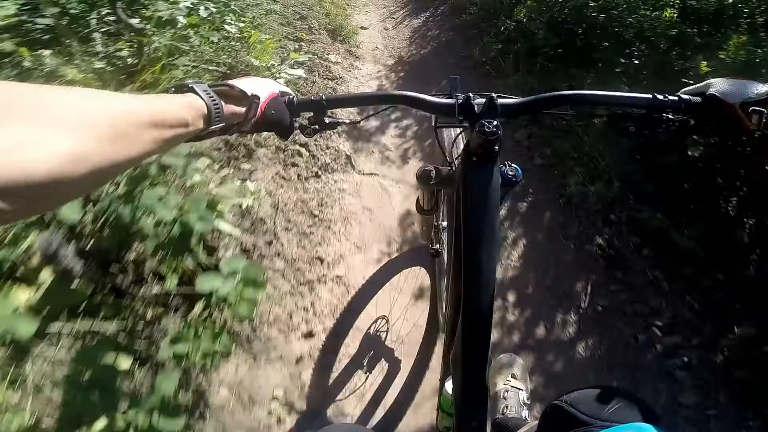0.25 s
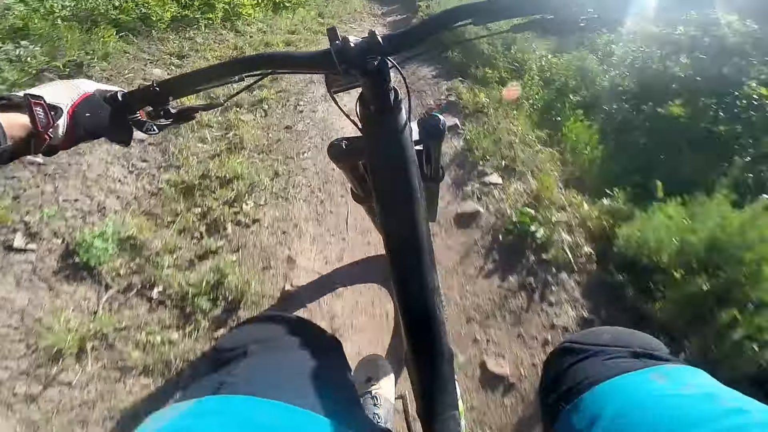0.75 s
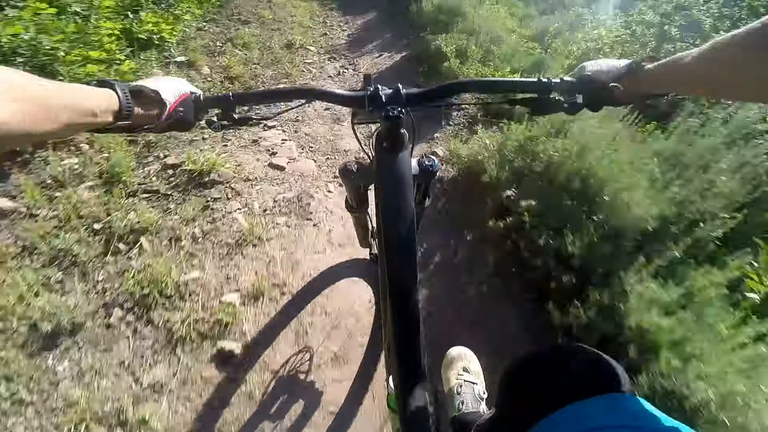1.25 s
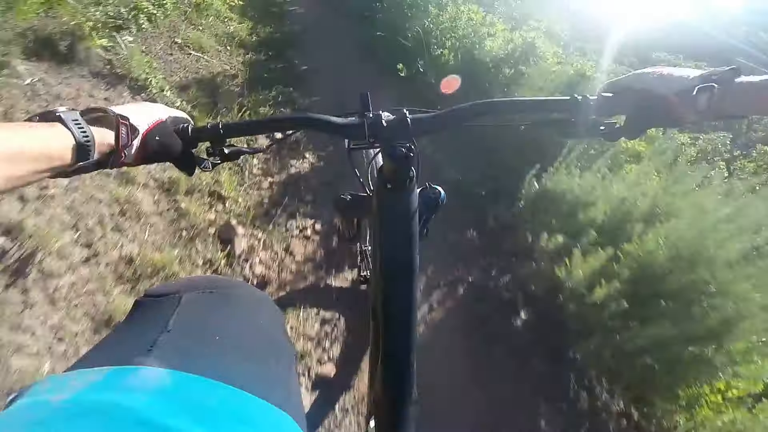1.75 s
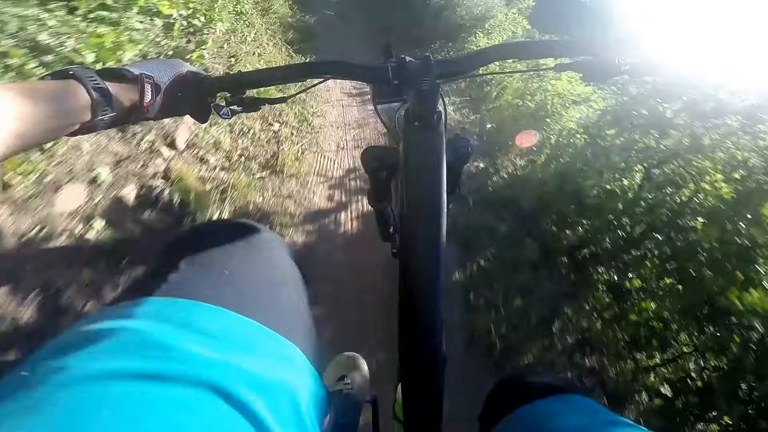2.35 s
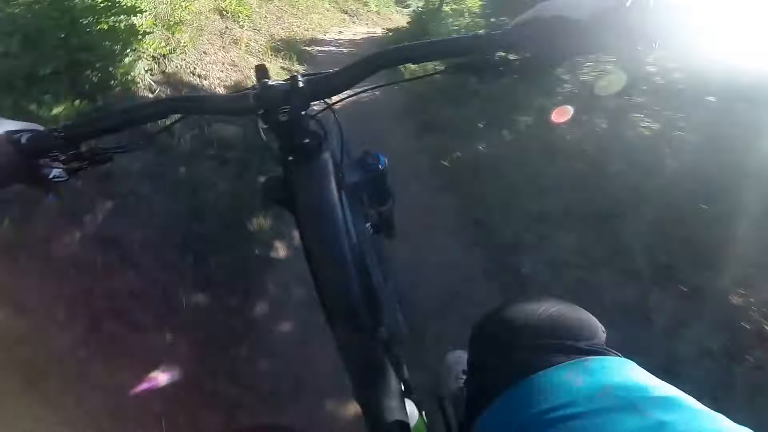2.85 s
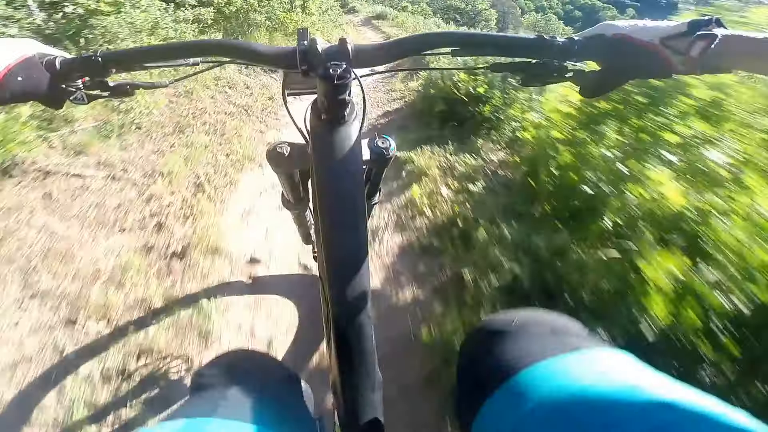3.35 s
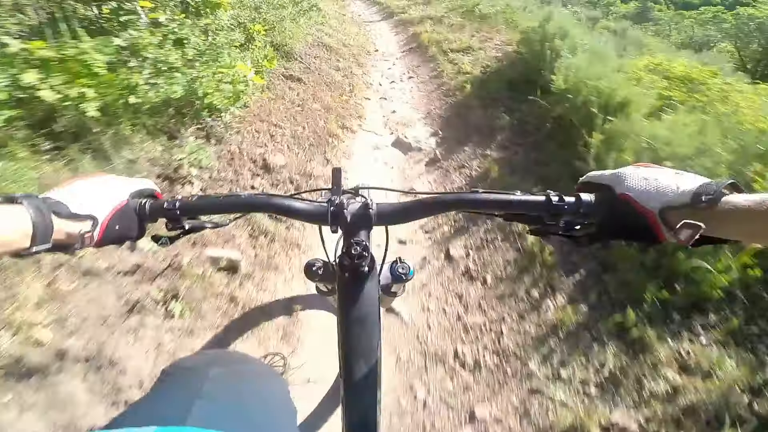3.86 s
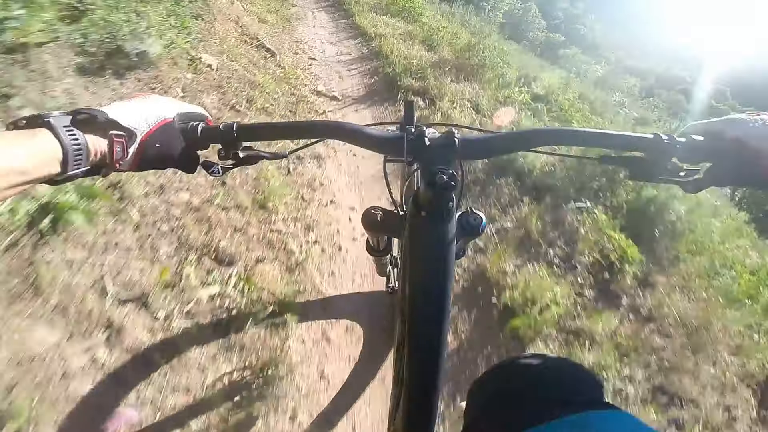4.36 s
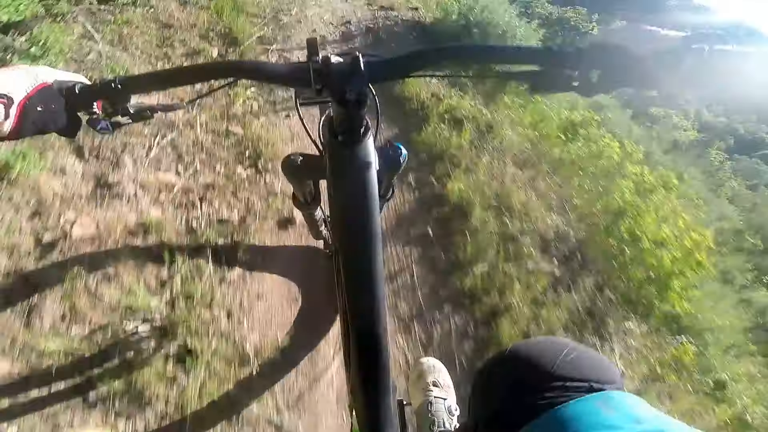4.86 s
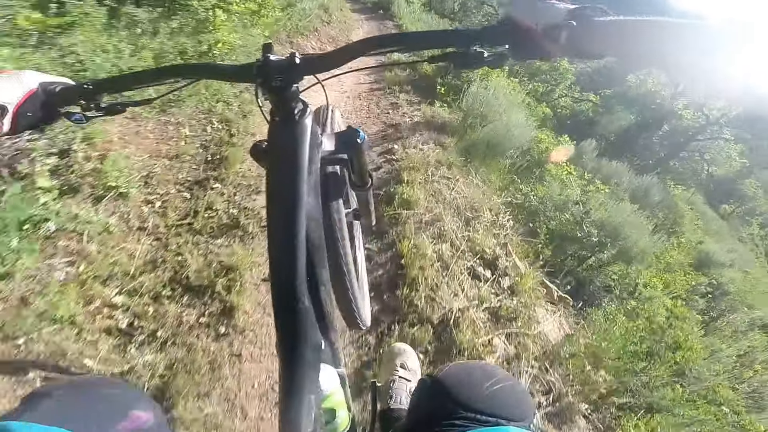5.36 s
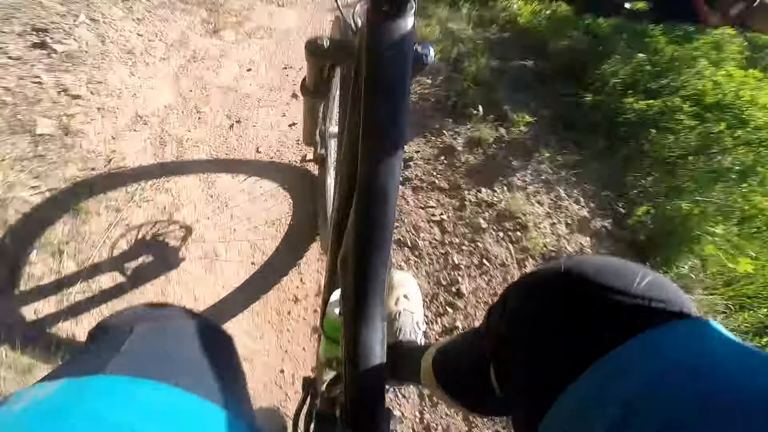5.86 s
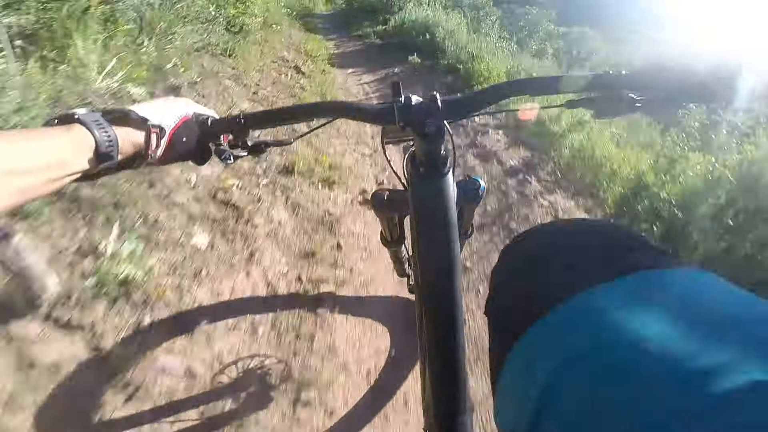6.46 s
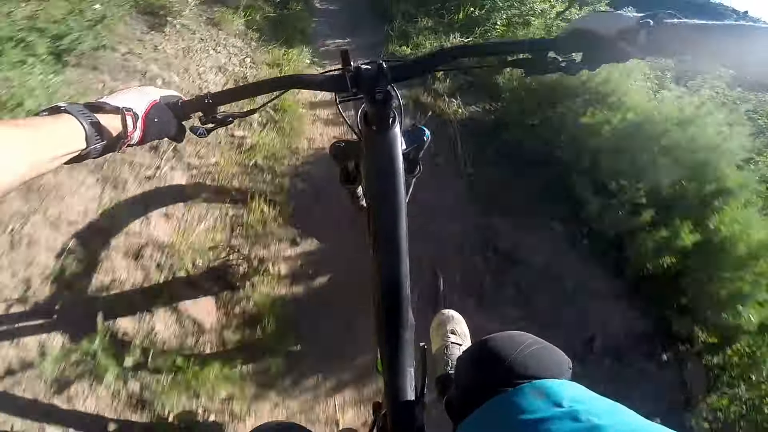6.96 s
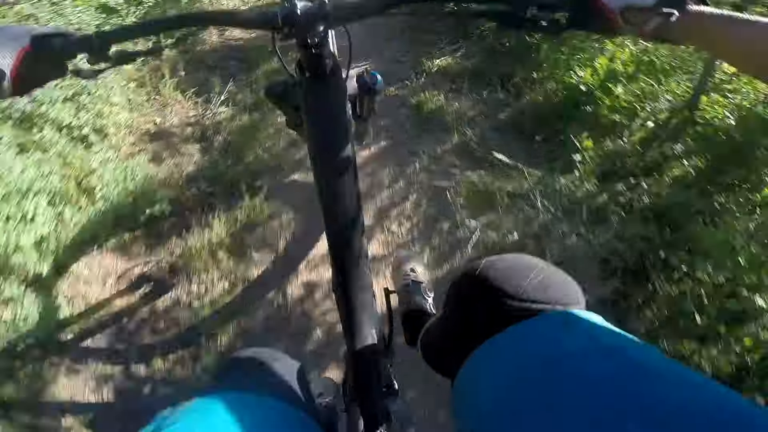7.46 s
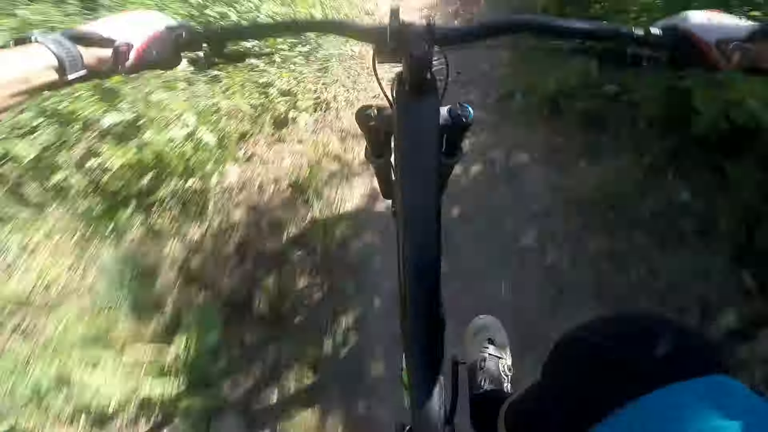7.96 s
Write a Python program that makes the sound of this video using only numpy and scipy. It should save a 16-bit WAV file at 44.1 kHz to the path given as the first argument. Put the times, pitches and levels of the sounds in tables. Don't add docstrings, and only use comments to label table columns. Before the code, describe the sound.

Close plastic knocks and deep thuds jolt over muffled wind, faint tyre grit and chain hiss as a bike rolls fast on rough dirt.

```python
import sys
import numpy as np
from scipy import signal
from scipy.io import wavfile

SR = 44100
rng = np.random.default_rng(int(sys.argv[2]) if len(sys.argv) > 2 else 0)


def wav_record(signal):
    frames = np.transpose(np.atleast_2d(signal))
    bounded = np.clip(frames, -1, 1)
    quanta = np.round(bounded * 32767).astype(np.int16)
    wavfile.write(sys.argv[1], SR, quanta)


def volts_from_decibels(level):
    exponent = np.asarray(level, float) / 20
    return 10 ** exponent


N = 362061

# time in seconds, buffeting level in dB.
GUSTS = [(0.0, -21), (0.17, -33), (0.4, -19.5), (0.67, -27.5), (0.84, -34.5), (1.2, -25), (2.6, -24),
         (3.02, -27.5), (3.25, -30.5), (3.52, -24.5), (3.72, -30), (4.02, -22.5), (5.19, -21),
         (5.65, -35.5), (6.0, -16.5), (6.25, -26.5), (7.95, -27.5), (8.21, -33.5)]
# time in seconds, extra rumble in dB.
GROUND = [(0.0, 0.5), (0.5, 5), (0.85, -1.5), (2.55, 5), (3.3, 0.5), (5.05, 3), (5.4, 1), (6.3, 3.5),
          (6.8, -7), (7.3, 6.5), (7.75, -1.5), (8.21, -3.5)]
# frequency in Hz, width in Hz, level in dB.
RUMBLE_PEAKS = [(104, 63, -6), (194.6, 101, -7), (274, 62.5, -7)]
# time in seconds, tyre grit level in dB, drivetrain hiss level in dB.
ROLL = [(0.0, -55.5, -65), (0.41, -51.5, -66), (1.17, -51.5, -68.5), (1.48, -49.5, -66.5),
        (2.12, -49.5, -64.5), (2.47, -53.5, -66.5), (2.9, -52, -68.5), (3.06, -52.5, -65),
        (3.47, -51.5, -66.5), (4.39, -51, -68), (4.62, -53.5, -63.5), (5.28, -47, -63.5),
        (5.67, -55.5, -64), (5.99, -43, -60.5), (6.27, -52, -69.5), (6.85, -53.5, -64), (7.87, -52.5, -65),
        (8.21, -58.5, -76)]
# frequency in Hz, width in Hz, level in dB.
GRIT_PEAKS = [(470, 133, 1), (1084, 540, -1.5), (1440, 220, 3), (2036, 560, 1.5), (2302, 570, 4),
              (3270, 74, -9.5)]
# frequency in Hz, width in Hz, level in dB.
HISS_PEAKS = [(3770, 1460, -3.5), (5200, 290, -2), (6230, 700, -1), (7400, 270, -13.5), (8600, 710, -22),
              (10300, 300, -26), (10280, 2700, -2.5)]
# start in seconds, length in seconds, level in dB.
PEDALLING = [
    (0.018, 0.78, -67.5),
    (1.72, 0.68, -61.5),
    (2.845, 0.31, -60),
    (4.35, 1.1, -66),
    (5.75, 0.8, -73),
    (6.75, 1.9, -68.5),
]
# frequency in Hz, width in Hz, level in dB.
CHAIN_PEAKS = [(5150, 380, 1), (7440, 260, -11), (3900, 140, 0), (3220, 82, -2), (6350, 1300, -12)]
# start in seconds, length in seconds, crisp level in dB, dull growl in dB.
SCRAPES = [(5.043, 0.06, -46, -35), (5.322, .045, -46, -60), (3.83, 0.14, -50, -56),
           (2.893, 0.12, -47, -54), (0.65, 0.076, -45.5, -49), (1.338, 0.16, -38, -36),
           (1.79, 0.02, -47, -39.5), (1.868, 0.1, -42, -60), (2.016, 0.02, -39.5, -57),
           (3.017, 0.11, -41, -46.5), (4.45, 0.23, -48.5, -71), (4.932, 0.093, -54, -34),
           (5.152, 0.11, -54, -37.5), (5.772, 0.14, -35, -65), (5.885, 0.036, -45, -33),
           (5.943, 0.073, -39, -23.5), (7.876, 0.058, -39.5, -39.5), (8.008, 0.068, -34.5, -31.5)]
# frequency in Hz, width in Hz, level in dB.
GROWL_PEAKS = [(239, 65, 8), (475, 240, -13.5)]
# start in seconds, level in dB, time to fall 60 dB in seconds.
SIZZLES = [
    (2.965, -45, .025),
    (3.014, -45, .025),
    (5.827, -33, .03),
    (5.836, -29, .015),
    (7.554, -38, .03),
    (1.453, -39, .025),
    (7.932, -40, .015),
    (1.384, -31, .015),
]
# centre in seconds, pressure (+ in, - out), half length in ms.
SHOVES = [(0.342, -0.13, 21), (0.679, 0.079, 10), (1.115, 0.12, 24), (1.384, -0.016, 26),
          (1.644, 0.099, 22), (1.806, 0.11, 13), (1.82, -0.074, 23), (1.838, -0.05, 7.6), (3.039, 0.13, 20),
          (3.506, 0.15, 11.5), (3.53, -0.075, 25), (3.979, -0.077, 12), (4.01, 0.093, 17),
          (4.105, -0.12, 13), (4.143, -0.15, 26), (4.531, -0.13, 28), (4.6, -0.18, 14), (4.639, 0.056, 14),
          (5.093, -0.16, 22), (5.963, -0.012, 11), (6.134, 0.11, 8.4), (6.418, -0.088, 21),
          (6.803, .09, 19), (1.356, -0.16, 37), (1.451, 0.31, 7.8), (1.468, -0.2, 11), (1.59, 0.42, 2.6),
          (1.602, -0.49, 11.4), (2.958, 0.13, 24), (2.977, -0.26, 15), (3.01, -0.14, 7.2), (3.922, 0.2, 11),
          (3.943, -0.18, 9.9), (4.123, 0.21, 7.7), (5.846, -0.3, 9.6), (5.865, 0.17, 6.1),
          (5.89, 0.091, 17), (5.98, 0.58, 4.3), (5.998, -0.51, 16), (6.021, 0.16, 39), (6.151, -0.33, 16),
          (6.269, -0.21, 16.5), (7.124, -0.18, 13), (7.402, -0.22, 11.5), (7.951, -0.31, 7.7),
          (7.971, 0.15, 15), (8.018, 0.17, 12), (8.055, 0.55, 3.3), (8.064, -0.39, 15)]
# start in seconds, level in dB, frequency in Hz, 60 dB decay in seconds.
WOBBLES = [(.656, -20.5, 71, 0.082), (1.077, -26.5, 117, 0.13), (1.32, -15.5, 72, 0.1),
           (2.55, -21, 98, .08), (2.69, -28, 90, 0.059), (2.952, -16, 95, 0.065), (3.989, -28, 126, 0.11),
           (4.62, -31.5, 210, 0.07), (5.576, -21.5, 60, 0.14), (6.45, -28.5, 110, 0.064),
           (6.899, -22.5, 79, 0.1), (1.116, -26, 260, 0.035), (1.375, -11.5, 124, 0.059),
           (1.44, -22, 264, 0.027), (1.51, -22.5, 128, 0.078), (1.59, 2.5, 174, 0.02),
           (4.526, -24, 273, 0.039), (4.938, -19, 95, 0.14), (4.95, -24, 304, 0.043),
           (4.967, -9.5, 124, 0.05), (4.98, -29, 290, 0.033), (5.054, -40, 330, 0.04),
           (5.184, -29, 267, 0.035), (7.38, -26, 267, 0.045), (7.425, -25, 277, 0.035),
           (5.935, -22, 260, 0.035), (4.99, -17.5, 121, 0.12), (5.041, -17.5, 240, 0.035),
           (5.11, -20, 121, 0.12), (5.169, -14, 160, 0.03), (5.914, -10, 140, 0.077),
           (5.956, -15, 170, 0.066), (5.987, -5, 122, 0.059), (6.124, -8.5, 180, 0.019),
           (7.147, -13, 123, 0.11), (7.173, -29, 133, 0.076), (7.316, -23.5, 99, 0.13),
           (7.587, -11.5, 120, 0.023), (7.985, -18, 119, 0.085), (8.028, -37, 270, 0.055),
           (8.053, 7.5, 169, 0.015)]
# start in seconds, level in dB,
# frequency in Hz, 60 dB decay in seconds.
KNOCKS = [(0.341, -21, 1376, 0.03), (0.341, -23, 457, 0.038), (1.384, -27, 606, 0.07),
          (5.0415, -21, 1077, 0.07), (5.041, -19, 476, 0.032), (5.0415, -25, 2230, 0.035),
          (1.4, -27, 450, 0.02), (5.914, -23, 920, 0.02), (5.912, -22, 400, 0.04), (1.819, -37, 480, 0.11),
          (6.485, -32, 480, 0.02), (6.595, -15, 360, 0.006), (3.05, -24, 1120, 0.026),
          (3.106, -37, 865, .04), (8.054, -18.5, 820, 0.013), (5.169, -13, 620, 0.009),
          (6.338, -27, 504, 0.044), (1.414, -17, 360, .025), (1.441, -17, 340, .018),
          (5.881, -21, 600, 0.05), (5.881, -19, 1540, 0.035), (5.958, -20, 400, 0.025),
          (5.996, -10, 520, 0.027), (5.996, -19, 1100, 0.03), (7.145, -21.5, 550, 0.008),
          (7.957, -27, 600, 0.09), (5.171, -25, 1250, .015),
          (5.012, -33, 1250, .04),
    (5.911, -25, 600, .03),
    (5.935, -30, 900, .02),
    (5.973, -25, 700, .02),
    (5.991, -24, 750, .02),
    (6.004, -25, 800, .02),
]
# time in
# seconds, level in dB, brightness in dB.
SHELL_BLOWS = [(1.3388, -19.5, -1), (1.3841, -3.5, 4), (1.3891, -12, -7), (1.4526, -17.5, 4),
               (1.4637, -3.5, -1.5), (1.4718, -27, -14), (1.4747, -11.5, 0), (1.501, -6.5, -2.5),
               (1.5132, -12.5, 4), (1.5191, -14, -8), (1.5779, -26, 6), (1.5802, -18, -13), (1.7086, -25, 6.5),
               (1.7119, -17.5, -0.5), (2.3462, -23.5, -18), (3.1059, -19, -12), (3.8382, -19.5, -23),
               (3.8905, -17, -9), (3.9125, -20.5, -19), (4.8192, -18.5, -10), (4.8645, -16.5, -8.5),
               (4.8706, -22, -17), (4.8771, -19, -4.5), (5.0414, -24, -19), (5.2515, -13.5, -1),
               (5.2546, -27, -6), (5.26, -17, -8), (5.2632, -16.5, 11.5), (5.2696, -10.5, 4), (5.3281, -4, -1),
               (5.342, -20, -5), (5.3976, -17.5, -21), (5.4085, -19.5, 1), (5.4412, -16, -8), (5.649, -15, -9),
               (5.8282, -10.5, -8.5), (5.8335, -20, 7), (5.8369, -2, -6.5), (5.8791, -5, -18), (5.8844, -9.5, -3),
               (5.89, -17.5, -19), (5.9591, -17, -21), (5.9971, -34, -14), (6.033, -24, -24), (6.0695, -18, 1),
               (6.1105, -18, 2.5), (6.3228, -14.5, -23), (7.4641, -18, -18), (7.5536, -14.5, -1),
               (7.5571, -21, 1), (7.5731, -19.5, -17), (7.7404, -8.5, 0.5), (7.7478, -21.5, -3),
               (7.9332, -6, -6.5), (7.9558, -5.5, -2), (7.9629, -4.5, -3), (7.9659, -9.5, -3), (7.9762, -18, -7),
               (7.9851, -13.5, -9), (7.9946, -15.5, -5),
               (1.4163, -35, -20), (2.968, -41, 14), (2.971, -48, 9), (3.0155, -41.5, 10),
               (3.0195, -46, 12), (5.5896, -23, -15), (5.8254, -17, -9), (7.855, -29, -18),
               (7.8899, -27, -16), (7.678, -36, -18), (7.5597, -30, 9)]
# time in seconds, level in dB.
PAD_TAPS = [(0.3394, -34), (0.3468, -28.5), (0.3771, -22.5), (0.4297, -35), (0.6755, -40), (0.9051, -34),
            (1.0792, -34), (1.3022, -21), (1.3983, -28), (1.6738, -28.5), (1.6788, -27.5), (1.7202, -20.5),
            (1.7722, -28), (1.8844, -29), (1.9034, -28), (1.9259, -22.5), (1.9318, -31), (2.2886, -31),
            (2.9081, -22), (3.0466, -33), (3.0498, -29), (3.0746, -22.5), (3.1168, -27), (3.2052, -24),
            (3.2138, -28), (3.3319, -24.5), (3.3346, -35), (3.3373, -23), (3.3409, -24), (3.8504, -25),
            (3.8756, -30), (3.9178, -30), (4.0183, -26.5), (4.3452, -31.5), (4.8108, -29), (4.9318, -26.5),
            (5.1699, -31), (5.4668, -25), (5.4727, -33), (5.6522, -37), (5.7817, -30.5), (5.898, -23),
            (5.9113, -28), (5.9921, -25), (6.1005, -24.5), (6.3061, -30), (6.3416, -37), (6.4839, -24.5),
            (7.5824, -32), (7.7221, -26), (7.7548, -24), (7.9097, -29), (8.0289, -31), (8.0546, -38),
            (8.2047, -36)]
# time in seconds, level in dB.
FACE_TAPS = [(0.3503, -41), (1.0573, -41), (1.0597, -39), (1.3107, -26), (1.3322, -20), (1.4412, -28),
             (1.4591, -20), (1.4837, -29), (1.5944, -24), (1.7242, -25.5), (1.7277, -26), (1.8944, -43),
             (1.9168, -45), (1.948, -32.5), (2.0185, -32.5), (2.8827, -34.5), (2.9399, -28),
             (2.9873, -35.5), (3.3268, -26), (3.5302, -34.5), (3.6667, -45), (3.8454, -32), (3.8964, -46),
             (3.9957, -33.5), (4.1529, -47), (4.1723, -55), (4.4886, -36), (4.8854, -35), (5.2046, -42),
             (5.2269, -25), (5.2312, -34), (5.2344, -21), (5.3247, -23), (5.3497, -29), (5.4161, -40),
             (5.5941, -21), (5.6023, -32), (5.6122, -27), (5.8178, -23), (5.8224, -28), (5.9727, -29),
             (6.008, -33), (6.1076, -30), (6.1484, -34), (6.2607, -21.5), (6.2756, -49), (6.2941, -36),
             (6.3011, -32), (7.4596, -21.5), (7.4695, -33), (7.5892, -46), (7.6479, -31), (7.653, -32),
             (7.9233, -35), (8.1279, -32.5)]
# time in seconds, level in dB.
EDGE_TICKS = [(0.2473, -34), (0.3909, -35), (1.0432, -43), (1.1247, -46), (1.1663, -46), (1.1897, -39),
              (1.2809, -33.5), (1.6419, -42), (1.8998, -42), (1.9117, -34), (2.9654, -35), (3.0151, -31),
              (3.1031, -33), (3.1144, -28), (3.1238, -28), (3.1322, -41), (3.1901, -31), (3.3556, -34.5),
              (3.5209, -45), (3.746, -45), (3.7897, -39), (3.9927, -42), (4.3082, -27.5), (4.4469, -32.5),
              (4.6446, -47), (4.8306, -49), (5.0118, -38), (5.1814, -41), (5.2097, -31.5), (5.2421, -31),
              (5.3159, -36), (5.3389, -27), (5.4245, -49), (5.4546, -45), (5.4771, -32.5), (5.5384, -41),
              (5.5735, -47), (5.5989, -32), (5.6061, -41), (5.8134, -36), (6.2105, -37.5), (6.2491, -28.5),
              (6.6733, -44), (7.3294, -44), (7.4155, -38.5), (7.5507, -30), (7.5633, -35), (7.609, -38),
              (7.6116, -34), (7.6176, -44), (7.6559, -30.5), (7.9502, -33), (8.0451, -29.5), (8.0576, -26),
              (8.1215, -38)]
# time in seconds, level in dB.
FLICKS = [(0.165, -48), (0.181, -49), (0.4174, -41), (1.2585, -49), (1.7823, -38), (1.8517, -32),
          (1.9904, -45), (2.1151, -44), (2.3017, -45), (2.3074, -38), (2.38, -48), (2.4239, -34),
          (2.5644, -56), (3.038, -39), (3.8082, -28), (3.9604, -35), (4.1006, -36), (4.5072, -34),
          (4.5301, -39), (4.5344, -29), (4.9781, -36), (5.1891, -29), (5.3654, -43), (5.5593, -43),
          (5.7892, -33), (5.8574, -46), (5.9409, -33), (5.9514, -33), (6.4557, -32), (7.0564, -40),
          (7.5378, -51)]
# frequency in Hz, level in dB, 60 dB decay in seconds.
SHELL_LOW = [(608, -5.5, 0.023), (1206, -7, 0.017), (1529, 1.5, 0.02), (1803, -4.5, 0.01),
             (2137, 5.5, 0.0074), (2540, 3, 0.01), (3210, -1, 0.0062)]
SHELL_HIGH = [(3170, 4, 0.0034), (5300, 2.5, 0.0028), (6580, -6, 0.005), (7580, -3, 0.0029)]
SHELL_TOP = [(8800, -24, 0.0018), (8920, -2, 0.00098), (11740, -10.5, 0.0032), (11400, -21, 0.0078),
             (13000, -37, .003)]


def in_time(rows):
    s, *columns = np.transpose(rows)
    return [np.interp(np.arange(N) / SR, s, column) for column in columns]


def rms_one(x):
    return x / np.sqrt(np.mean(x ** 2) + 1e-20)


def dulled(x, hz):
    return signal.sosfilt(signal.butter(3, hz, fs=SR, output="sos"), x)


def banded(x, order, low_hz, high_hz):
    return signal.sosfilt(signal.butter(order, [low_hz, high_hz], "band", fs=SR, output="sos"), x)


def drift(rate):
    r = np.exp(-80 * np.pi * rate / SR)
    noise = rng.standard_normal(N // 40 + 2002)
    slow = signal.lfilter([1], [1, -2 * r, r * r], noise)[2000:]
    return np.interp(np.arange(N) / 40, np.arange(len(slow)), rms_one(slow))


def grains(per_s, spread_db):
    sizes = volts_from_decibels(spread_db * np.minimum(rng.exponential(1, N), 5)) * rng.choice([-1, 1], N)
    return rms_one(sizes * (rng.random(N) < per_s / SR))


def resonant(force, peaks, patchy_db, rate):
    out = 0
    for k, (hz, width_hz, db) in enumerate(peaks):
        r = np.exp(-np.pi * width_hz / SR)
        band = signal.lfilter([1, 0, -1], [1, -2 * r * np.cos(2 * np.pi * hz / SR), r * r], force)
        flicker = volts_from_decibels(db + patchy_db * drift(rate))
        out = out + (-1) ** k * (1 - r * r) * flicker * band
    return rms_one(out)


def ring(force, hz, t60):
    r, w = volts_from_decibels(-60 / (t60 * SR)), 2 * np.pi * hz / SR
    return signal.lfilter([0, np.sin(w)], [1, -2 * r * np.cos(w), r * r], force + 1e-18)


def wind(level_db):
    eddies = banded(rng.standard_normal(N), 1, low_hz=14.1, high_hz=22.3)
    return volts_from_decibels(level_db - 6.5) * rms_one(dulled(eddies, hz=89.5))


def rumble(air_db, grit_db, lumps_db):
    wind_share, load_share = 0.089, 0.1
    level_db = -47 + in_time(GROUND)[0]
    level_db = level_db + wind_share * (air_db - air_db.mean()) + load_share * (grit_db - grit_db.mean())
    shaking = resonant(rng.standard_normal(N), RUMBLE_PEAKS, patchy_db=4.0, rate=5.3)
    return volts_from_decibels(level_db + 0.23 * lumps_db - 0.5) * dulled(shaking, hz=650)


def tyre_grit(level_db):
    stones = grains(per_s=1500, spread_db=0.5) + 0.84 * rng.standard_normal(N)
    heard = resonant(stones, GRIT_PEAKS, patchy_db=2.0, rate=9.0)
    return dulled(volts_from_decibels(level_db + 1.5) * heard, hz=4040)


def drivetrain(hiss_db, shake_db):
    links = grains(per_s=300, spread_db=2.5) + 1.5 * rng.standard_normal(N)
    low = 0.8 * volts_from_decibels(hiss_db + shake_db + 4.5) * resonant(links, HISS_PEAKS[:1], patchy_db=1.7, rate=5.0)
    middle = volts_from_decibels(hiss_db - 7.5) * resonant(links, HISS_PEAKS[1:2], patchy_db=4.0, rate=16.0)
    top = volts_from_decibels(0.5 * hiss_db - 45.5) * resonant(links, HISS_PEAKS[2:], patchy_db=1.5, rate=2.8)
    return low + middle + top + chain_song(links)


def chain_song(links):
    load = np.zeros(N)
    for s, length, db in PEDALLING:
        at = round(s * SR)
        spell = volts_from_decibels(db) * np.sqrt(np.hanning(round(length * SR)))[:N - at]
        load[at:at + len(spell)] += spell
    song = 0
    for hz, width_hz, db in CHAIN_PEAKS:
        band = rms_one(banded(links, 2, hz - width_hz / 2, hz + width_hz / 2))
        song = song + volts_from_decibels(db + 2.3 * drift(27.0)) * band
    return load * rms_one(song)


def scrapes():
    crisp, dull = np.zeros((2, N))
    for s, length, db, growl_db in SCRAPES:
        stroke = np.sqrt(np.hanning(round(length * SR)))
        crisp[round(s * SR):][:len(stroke)] += volts_from_decibels(db) * stroke
        dull[round(s * SR):][:len(stroke)] += volts_from_decibels(growl_db) * stroke
    shell_peaks = [*GRIT_PEAKS, *HISS_PEAKS[:1]]
    shell = resonant(grains(per_s=1800, spread_db=4.0), shell_peaks, patchy_db=2.5, rate=30.0)
    harness = resonant(grains(per_s=500, spread_db=6.0), GROWL_PEAKS, patchy_db=1.5, rate=5.4)
    return crisp * dulled(shell, hz=3100) + dull * dulled(harness, hz=1490)


def sizzles():
    fading = np.zeros(N)
    for s, db, t60 in SIZZLES:
        t = np.arange(round(t60 * SR)) / SR
        fading[round(s * SR):][:len(t)] += volts_from_decibels(db - 60 * t / t60)
    fine = banded(grains(per_s=6000, spread_db=3.0), 1, low_hz=6500, high_hz=15000)
    return fading * rms_one(fine)


def shoves():
    out = np.zeros(N)
    for s, pressure, ms in SHOVES:
        swell = pressure * np.hanning(round(2 * ms * SR / 1000))
        at = round(s * SR) - len(swell) // 2
        out[at:at + len(swell)] += swell
    return out


def struck(rows, contact_cycles):
    out = np.zeros(N)
    for s, db, hz, t60 in rows:
        at = round(s * SR)
        t = np.arange(min(round(t60 * SR), N - at)) / SR
        swing = volts_from_decibels(db - 60 * t / t60) * np.sin(2 * np.pi * hz * t)
        out[at:at + len(t)] += swing * (1 - np.exp(-t * hz / contact_cycles))
    return out


def contacts():
    rows = SHELL_BLOWS
    for taps, bright_db in ((PAD_TAPS, -16.5), (FACE_TAPS, -1.5), (EDGE_TICKS, 5.5), (FLICKS, -7.5)):
        rows += [(s, db, bright_db) for s, db in taps]
    place, size, colour = rng.random((3, 40))
    stray_db = -46 + 3.0 * (2 * size - 1)
    stray_bright_db = -3 + 10.0 * (colour - 1)
    rows += zip(place * (N - 1) / SR, stray_db, stray_bright_db)
    return np.transpose(rows)


def camera_clicks():
    scatter_db, chatter, chatter_ms = 4.0, 0.1, 3.55
    lead_share, lead_ms = 0.12, 0.74
    hardness = 0.5
    s, db, brightness_db = contacts()
    at = np.round(s * SR).astype(int)
    mode_count = len(SHELL_LOW) + len(SHELL_HIGH) + len(SHELL_TOP)
    chance = rng.standard_normal((len(at), mode_count)).T.clip(-1.5, 1.5)
    rebounds = 3 * (rng.random(N) < 0.1)

    def strike(modes, hit_db, luck, ms, sign):
        out = 0
        fade, lead_fade = np.exp(-1000 / (ms * SR)), np.exp(-1000 / (lead_ms * SR))
        for k, (hz, mode_db, t60) in enumerate(modes):
            taps = np.zeros(N)
            reach_db = hardness * max(np.log2(hz / 7000), 0) * (hit_db + 18.5)
            taps[at] = volts_from_decibels(hit_db + mode_db + reach_db + scatter_db * luck[k])
            after = signal.lfilter([1], [1, -fade], taps + 1e-18)
            lead_in = signal.lfilter([lead_share], [1, -lead_fade], taps[::-1] + 1e-18)[::-1]
            rattle = chatter * (after + lead_in) * rebounds * rng.choice([-1, 1], N)
            out = out - sign ** k * ring(taps + rattle, hz, t60)
        return out

    body = dulled(strike(SHELL_LOW, db - 9.5, chance, chatter_ms, sign=0.94), hz=4000)
    crisp_db, brief_ms = db + brightness_db - 8.0, 0.5 * chatter_ms
    face = dulled(strike(SHELL_HIGH, crisp_db, chance[len(SHELL_LOW):], brief_ms, sign=-0.95), hz=8600)
    edge = strike(SHELL_TOP, crisp_db, chance[-len(SHELL_TOP):], brief_ms, sign=-0.89)
    return signal.sosfilt(signal.butter(2, 750, "high", fs=SR, output="sos"), body + face + edge)


def scene():
    air_db, = in_time(GUSTS)
    grit_db, hiss_db = in_time(ROLL)
    lumps_db = 3.2 * drift(12.0)
    shake_db = 1.2 * drift(25.0)
    ride = wind(air_db + lumps_db) + rumble(air_db, grit_db, lumps_db)
    ride = ride + tyre_grit(grit_db + shake_db) + drivetrain(hiss_db, shake_db)
    rubs = scrapes() + sizzles()
    mount = shoves() + struck(WOBBLES, contact_cycles=0.38)
    knocks = struck(KNOCKS, contact_cycles=0.32)
    return (ride + rubs + mount + knocks + camera_clicks())[None]


def band_limit(x):
    return signal.sosfilt(signal.butter(12, 16120, fs=SR, output="sos"), x)


def record(dry):
    muffled = signal.sosfilt(signal.butter(2, 10000, fs=SR, output="sos"), dry)
    mic_hiss = volts_from_decibels(-80.5) * signal.lfilter([1], [1, -0.6], rng.standard_normal(dry.shape))
    coupled = signal.sosfilt(signal.butter(1, 3.0, "high", fs=SR, output="sos"), muffled + mic_hiss)
    topped = signal.sosfilt(signal.butter(4, 13800, fs=SR, output="sos"), np.clip(coupled, -1, 1))
    return band_limit(topped)


dry = scene()
out = record(dry)
wav_record(out)
```